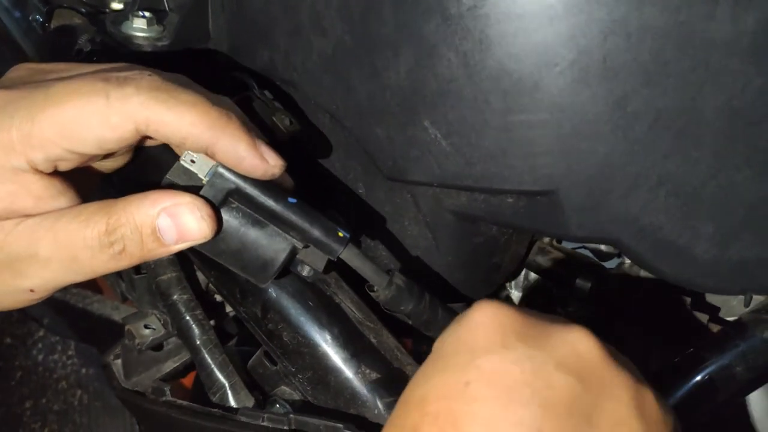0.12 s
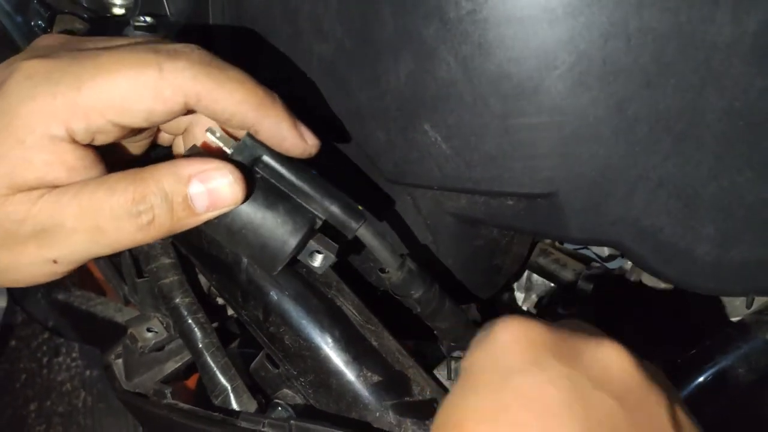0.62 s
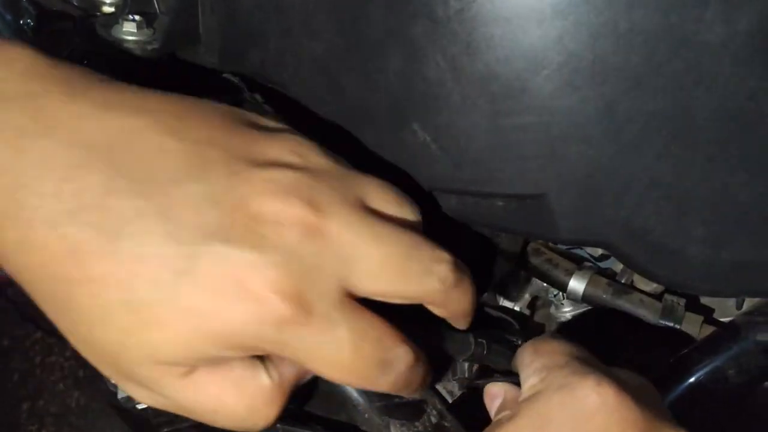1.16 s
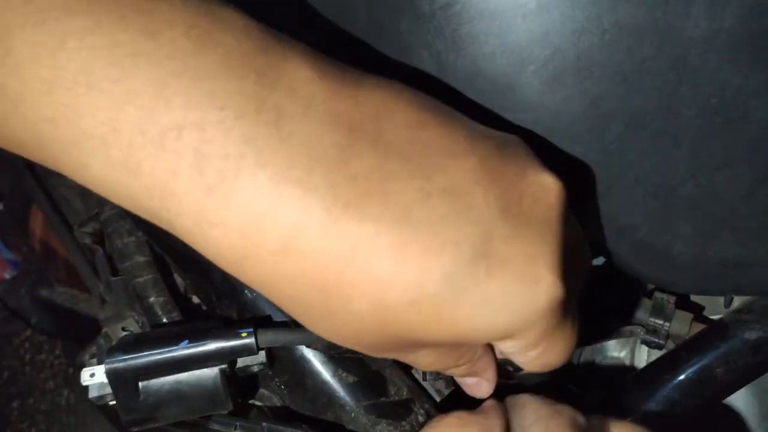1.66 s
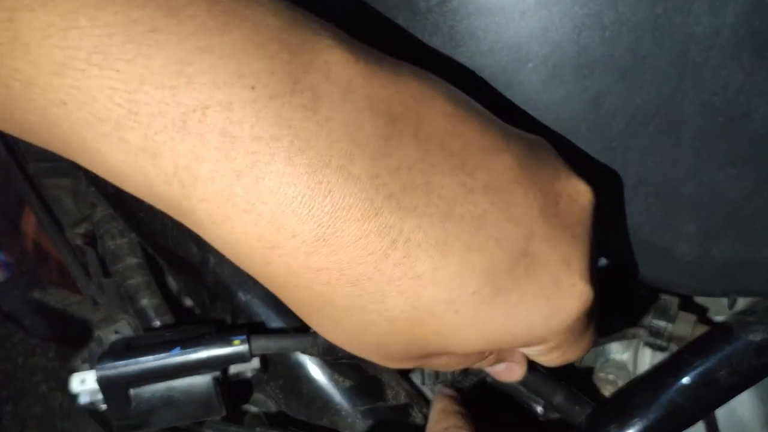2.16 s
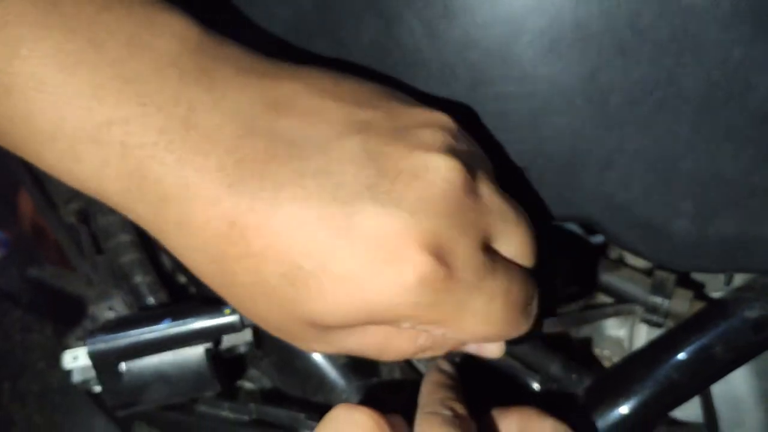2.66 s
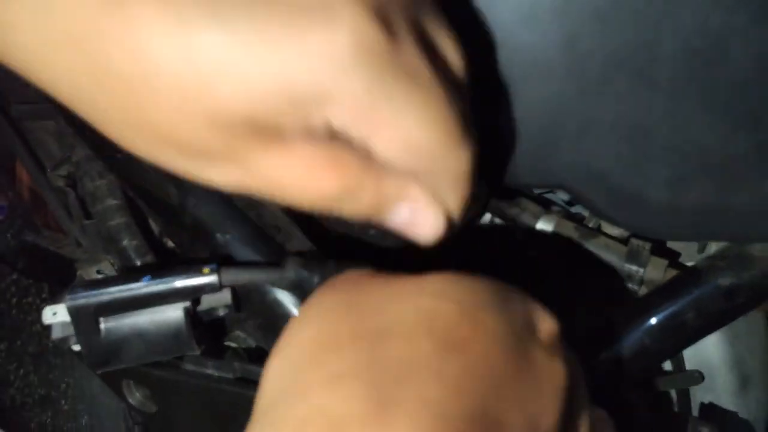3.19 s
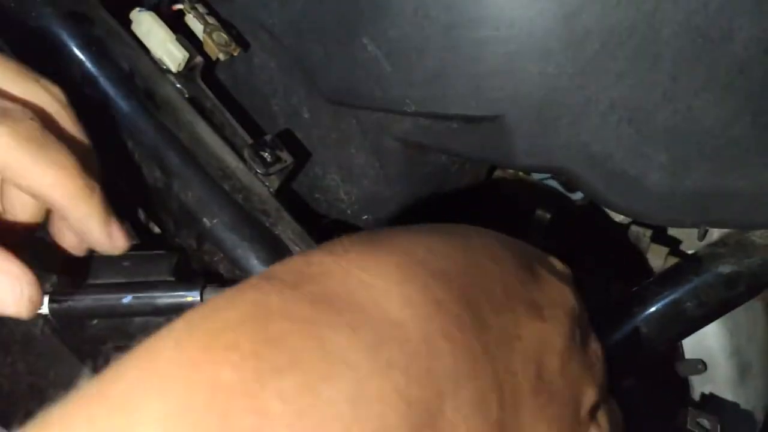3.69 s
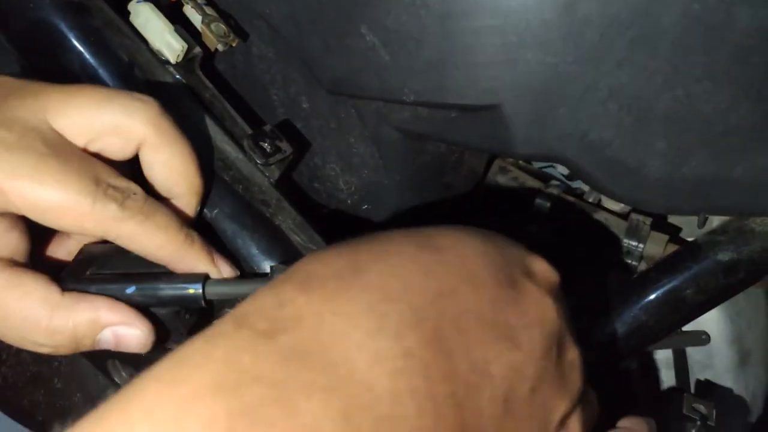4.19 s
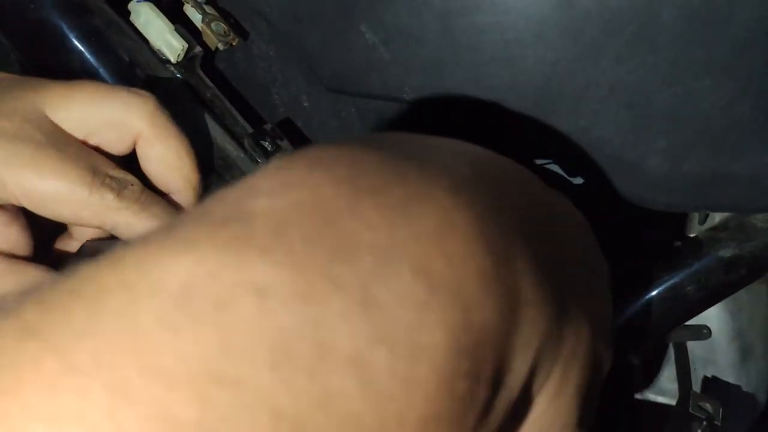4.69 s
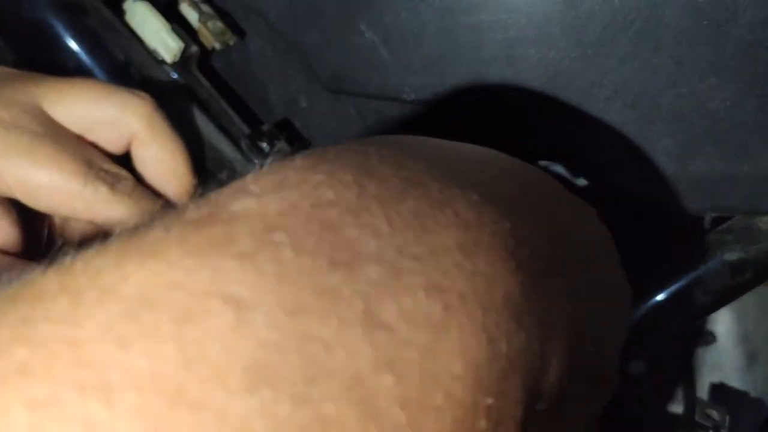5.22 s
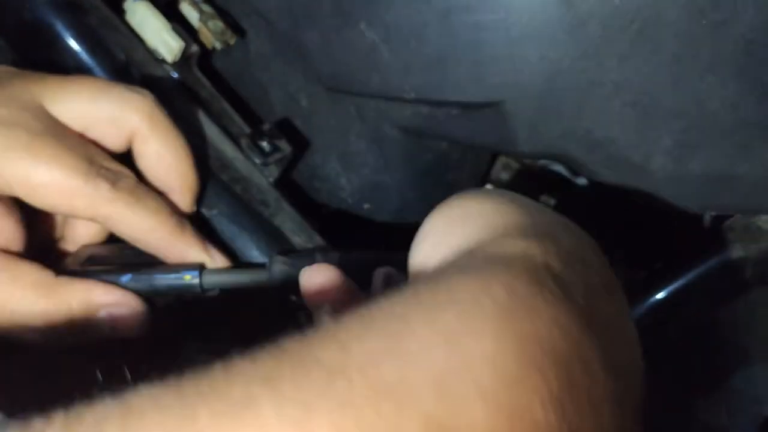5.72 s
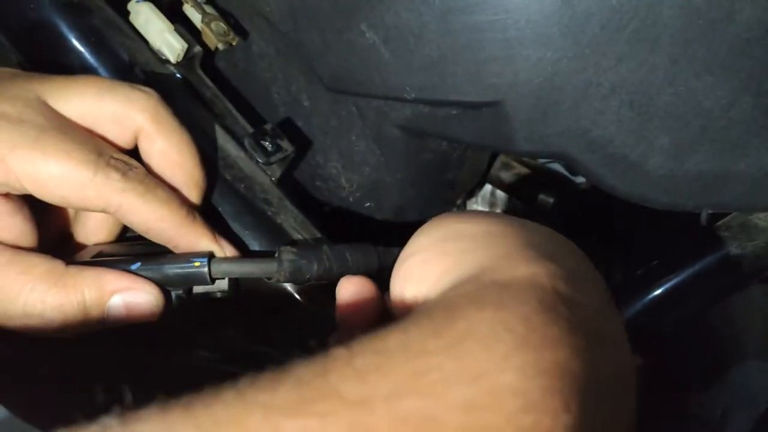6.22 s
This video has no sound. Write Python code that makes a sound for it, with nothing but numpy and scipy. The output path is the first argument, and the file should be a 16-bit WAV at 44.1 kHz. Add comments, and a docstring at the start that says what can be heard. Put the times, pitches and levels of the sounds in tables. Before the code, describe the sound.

Hands work on a scooter's coil and cable. After nearly silent fumbling, a hard plastic and metal hit rings out, then a second knock with a scrape. Sparse skin rustles, muted panel bumps and tiny snaps continue, much quieter. Close stereo pickup, sources slightly left, light room echo and steady low hiss.

```python
"""Hands free an ignition coil and its cable in the engine bay of a scooter, in a quiet workshop.
Room tone and microphone hiss, banded noise, run throughout; faint gliding squeaks of narrow noise come first.
Next cable and skin rub and rustle as shaped noise, and knocks on plastic panels excite damped modes.
At 0.73 s the coil clanks on the steel frame, strong modes over a clatter of noise; two softer clanks
follow near 4 s. Low hand bumps, decaying sines, join from 1.6 s; rubs and knocks go on to the end."""
import sys
import numpy as np
from scipy import signal
from scipy.fft import rfft, irfft
from scipy.io import wavfile

SR = 44100
rng = np.random.default_rng(int(sys.argv[2]) if len(sys.argv) > 2 else 0)


def put_to_file(sound):
    """Save the sound as 16-bit audio at rate SR, in the file named by the first command-line argument."""
    columns = np.atleast_2d(sound).T  # one column per channel
    safe = np.clip(columns, -1, 1)
    whole_steps = np.round(safe * 32767)
    wavfile.write(sys.argv[1], SR, whole_steps.astype(np.int16))


def invert_db(level):
    """Linear amplitude ratio for a level in decibels (20 dB per decade), elementwise."""
    return 10 ** (np.asarray(level, dtype=float) / 20)


N = 280431   # length in samples


def rms_one(x):
    """Scale to rms 1."""
    return x / np.sqrt(np.mean(x ** 2) + 1e-24)


def at_hz(points, hz, column=1):
    """Read a table on a log-frequency axis."""
    table = np.array(points)
    return np.interp(np.log(hz), np.log(table[:, 0]), table[:, column])


def band(x, low_hz, high_hz):
    """Gentle band-pass."""
    sos = signal.butter(2, [low_hz, min(high_hz, .45 * SR)], "band", fs=SR, output="sos")
    return signal.sosfilt(sos, x)


def drift(rate_hz):
    """Slow random wander: normal random points, rate_hz of them a second, joined by straight lines."""
    knots = rng.standard_normal(400)
    return np.interp(np.arange(N) / SR * rate_hz, np.arange(400), knots)


def banded_noise(spectrum, alike_table, patchy_db):
    """Third-octave bands of stereo noise, each with its own level, flicker and likeness; rms 1."""
    out, edges = 0, 25 * 2 ** (np.arange(29) / 3)
    white = rng.standard_normal((2, 2, N))
    for k, (low, high) in enumerate(zip(edges, edges[1:])):
        mid, side = band(white[k % 2], low, high)
        hz = np.sqrt(low * high)
        alike = np.clip(at_hz(alike_table, hz), -1, 1)
        gain = invert_db(at_hz(spectrum, hz) + patchy_db * drift(15.0))
        stereo = np.sqrt(1 + alike) * mid + np.sqrt(1 - alike) * side * [[1], [-1]]
        out = out + gain * stereo
    return rms_one(out)


def body(modes, apart_hz):
    """Ring of a struck body at both microphones; higher modes may differ more in phase, up to a limit."""
    left_lag_ms = 0.21
    t, out = np.arange(SR // 2 + SR // 4) / SR, 0
    for hz, level_db, t60 in modes:
        turn = rng.uniform(-0.93, 1) * min(hz / apart_hz, np.pi / 2)
        turn = turn + np.pi * hz * left_lag_ms / 1000
        fade_in = np.minimum(t * hz * 4, 1)   # a quarter cycle
        wave = np.sin(2 * np.pi * hz * t + turn * np.array([[-1], [1]]))
        out = out + invert_db(level_db - 60 * t / t60) * fade_in * wave
    return out


def add(out, sound, s, peak_db):
    """Lay a stereo sound in at time s; peak_db is the peak of its mono sum halved."""
    at = round(s * SR)
    peak = np.abs(sound.mean(axis=0)).max()
    out[:, at:at + sound.shape[1]] += invert_db(peak_db) * sound[:, :N - at] / peak


def contact(decay_ms, rise_ms=0.26, first=0.0):
    """A rattling touch: a noise burst that rises fast and dies away, with one firm impact if first > 0."""
    t = np.arange(SR // 8) / SR
    touch = rng.standard_normal(len(t)) * np.exp(-1000 * t / max(decay_ms, .2))
    touch = touch * np.minimum(1000 * t / rise_ms, 1)
    touch[round(rise_ms * SR / 1000)] += first * np.sqrt(np.sum(touch ** 2))
    return touch


def stroke(length_s, rising):
    """Swell and fade of one movement; rising is the share of it spent swelling."""
    progress = np.arange(round(length_s * SR)) / (length_s * SR)
    along = np.interp(progress, [0, np.clip(rising, .05, .95), 1], [0, .5, 1])
    return np.sin(np.pi * along) ** 1.3


# spectrum of room tone and hiss: pitch_hz, level_db (per Hz, relative)
TONE_SPECTRUM = [(25, -3.5), (60, -8), (100, -12.5), (230, -3), (400, -5.5), (600, -3), (1000, -5.5),
                 (1600, -7), (3200, -12), (6500, -14.5), (7500, -18), (9500, -19), (13500, -20.5),
                 (15700, -22.5)]
# how alike left and right are: pitch_hz, likeness (correlation, -1 to 1)
TONE_LIKENESS = [(60, 0.25), (150, 0.89), (380, 0.62), (950, 0.02), (2380, -0.027), (5980, 0.0083),
                 (15000, 0.035)]


def room_tone():
    """Faint room tone and microphone hiss: steady noise, more alike in the two channels in the bass."""
    return invert_db(-66) * banded_noise(TONE_SPECTRUM, TONE_LIKENESS, patchy_db=0.14)


# faint gliding squeaks: start_s, length_s, level_db, from_hz, to_hz
SQUEAK_EVENTS = [(0.076, 0.061, -73, 4000, 3900), (0.417, 0.037, -62.5, 4250, 4356),
                 (.45, .046, -63, 6300, 6446), (0.471, .086, -68.5, 4700, 4130),
                 (1.337, 0.055, -69, 6230, 6000), (3.39, .06, -70, 4400, 4970),
                 (3.64, 0.18, -70.5, 4230, 4780), (5.66, 0.067, -75, 4220, 4000),
                 (5.79, 0.111, -74, 4250, 4880)]


def squeaks():
    """Thin, broken, breathy tones that glide: narrow noise riding on a moving pitch."""
    out, broken = np.zeros((2, N)), invert_db(2.5 * drift(35.0))
    for s, length, level_db, from_hz, to_hz in SQUEAK_EVENTS:
        shape = stroke(length, 0.3)
        phase = 2 * np.pi * np.cumsum(np.linspace(from_hz, to_hz, len(shape))) / SR
        rough = rms_one(band(rng.standard_normal((2, 2, len(shape))), 12.0, 200.0))
        breathy = rough[0] * np.cos(phase) + rough[1] * np.sin(phase)
        at = round(s * SR)
        out[:, at:at + len(shape)] += invert_db(level_db) * shape * breathy
    return out * broken


# modes of the plastic panels: pitch_hz, level_db (relative), t60_s
PANEL_MODES = [(148.4, -9, 0.43), (189.6, 7, 0.04), (236.5, -5, 0.23), (277, -1, 0.064), (341.7, 5, 0.044),
               (406.6, 4, 0.037), (472, -5, 0.11), (528, 1.5, 0.063), (571.4, 4, 0.049), (669.4, 8, 0.04),
               (750, -3.5, 0.079), (829, -9, 0.13), (984, -4, 0.034), (1180, -7.5, 0.04)]


def panel_ring():
    """Plastic panels answer a push with a set of damped modes."""
    return body(PANEL_MODES, apart_hz=1500.0)


# rubs of cable and skin: start_s, length_s, rising (share of length), drag_db (on panels), rustle_db
RUB_EVENTS = [(0.237, 0.088, 0.226, -66, -64.5), (0.376, 0.22, .36, -77.5, -67.5),
              (1.053, 0.25, 0.051, -52.5, -60.5), (1.308, 0.21, 0.6, -74.5, -63.5),
              (1.399, 0.11, 0.22, -55.5, -73), (1.49, 0.22, 0.53, -55, -61), (1.679, 0.18, 0.21, -63, -64),
              (1.83, 0.039, 0.344, -60.5, -55.5), (2.6, 0.213, 0.33, -70, -80),
              (2.807, 0.1, 0.63, -62, -64.5), (2.939, 0.095, 0.81, -66, -59.5),
              (3.155, 0.129, .28, -69, -64.5), (3.356, 0.099, 0.4, -73, -66),
              (3.433, 0.13, 0.34, -52, -55.5), (3.519, 0.37, 0.2, -72, -68.5),
              (4.057, 0.25, 0.21, -70.5, -71), (4.36, 0.056, .08, -60, -55.5),
              (4.417, .36, 0.38, -66.5, -69.5), (5.103, 0.5, 0.11, -80.5, -70),
              (5.53, .074, 0.52, -50.5, -60), (5.578, .17, .2, -58, -68.5), (5.765, 0.21, 0.51, -83, -69.5),
              (5.879, .3, 0.114, -83, -63)]
# spectrum of skin rustle: pitch_hz, level_db (per Hz, relative)
RUSTLE_SPECTRUM = [(500, -30), (1000, -5), (2200, -5), (4500, -11.5), (6800, -12), (10000, -11.5),
                   (15500, -24)]


def rubs(panel):
    """Dragged cable sends dense slips into the panels; skin rustles, brightest round its centre."""
    brush_hz = 4700   # a light brush of skin is brightest here
    slips, out = np.zeros(N), np.zeros((2, N))
    slip_times = rng.random(N) < 500 / SR   # 500 a second on average
    grit = rms_one(rng.standard_normal(N) * slip_times * invert_db(2.1 * drift(32.0)))
    skin = banded_noise(RUSTLE_SPECTRUM, [(900, .3), (9000, .1)], patchy_db=1.2)
    skin = skin * invert_db(1.2 * drift(60.0))
    for s, length, rising, drag_db, rustle_db in RUB_EVENTS:
        shape = stroke(length, rising)
        here = slice(round(s * SR), min(round(s * SR) + len(shape), N))
        shape = shape[:here.stop - here.start]
        slips[here] += invert_db(drag_db) * shape * grit[here]
        # a firm drag spreads the rustle, a light brush keeps it narrow
        broad = invert_db(3.0 + 0.614 * (drag_db - rustle_db))
        narrow = band(skin[:, here], brush_hz / 1.33, brush_hz * 1.53)
        out[:, here] += invert_db(rustle_db) * shape * rms_one(broad * skin[:, here] + narrow)
    drag = signal.fftconvolve(panel, band(slips, 293.0, 1100.0)[None])[:, :N]
    return out + drag / np.sqrt(np.sum(panel ** 2) / 2)


# thumps on the panels: start_s, peak_db, centre_hz, contact_ms (decay of the touch)
THUMP_EVENTS = [(.263, -47.5, 568, 8.8), (.730, -24, 620, 6.4), (.959, -45, 580, 3.9),
                (1.042, -25.5, 534, 2.4), (1.047, -28.5, 250, 3.1), (1.053, -25, 450, 4.7),
                (1.106, -38.5, 422, 3), (1.403, -42.5, 435, 12), (1.444, -48.5, 297, 4.8),
                (1.577, -43.5, 565, 5), (1.595, -39, 540, 3.3), (1.606, -32.5, 620, 4.7),
                (1.619, -44, 590, 2.7), (1.763, -43, 750, 5.5), (1.837, -43.5, 232, 6.5),
                (2.030, -41.5, 620, 2.7), (2.786, -50.5, 352, 3.8), (2.843, -51, 500, 8.9),
                (2.866, -45, 440, 5), (2.919, -36, 624, 3.3), (3.041, -47, 425, 3),
                (3.095, -56.5, 600, 3.5), (3.151, -51.5, 700, 5.6), (3.952, -41, 641, 9.2),
                (3.965, -43.5, 523, 5), (4.365, -43, 640, 6.2), (5.557, -46.5, 250, 9),
                (5.575, -36.5, 520, 3), (5.751, -56, 304, 8), (5.974, -57.5, 400, 7.3)]


def thumps(panel):
    """A rattling push, banded round its own pitch, rings the nearby panel modes."""
    out = np.zeros((2, N))
    for s, peak_db, hz, ms in THUMP_EVENTS:
        push = band(contact(ms, rise_ms=1.665, first=0.82), hz / 2.11, hz * 2.16)
        push = band(push, hz / 2.3, hz * 2.2)   # a second pass keeps far modes still
        add(out, signal.fftconvolve(panel[:, :SR // 3], push[None]), s, peak_db)
    return out


# clicks of hard plastic: start_s, peak_db, centre_hz, contact_ms (decay of the touch)
CLICK_EVENTS = [(0.265, -48, 3500, 2.24), (.729, -16.5, 1500, 11.6), (.731, -27, 3760, 8.7),
                (1.042, -27.5, 4350, 2.72), (1.043, -30, 1330, 4.2), (1.594, -45, 3560, 6),
                (1.609, -50, 3470, 5.4), (1.646, -50.5, 4600, 12.2), (1.764, -41.5, 2780, 4.6),
                (3.010, -51, 2500, 3), (3.094, -55.5, 4000, 4), (3.151, -37.5, 4770, 4.3),
                (3.151, -44, 2090, 9.4), (4.183, -51.5, 4000, 1.24), (4.365, -46, 2780, 1.9),
                (5.307, -55.5, 6240, 4.8), (5.558, -45, 1580, 7.2), (5.562, -40.5, 4820, 5.1)]


def clicks():
    """Short snaps of hard plastic: banded noise bursts, partly different at each microphone."""
    out = np.zeros((2, N))
    for s, peak_db, hz, ms in CLICK_EVENTS:
        touch = contact(ms) + 1.54 * np.array([contact(ms), contact(ms)])
        octaves = 0.59 + 0.23 * hz / 1000   # a higher click spreads wider
        wide = 2 ** max(octaves / 2, .1)
        snap = band(touch, hz / wide, hz * wide) + 0.013 * band(touch, 1200.0, 8400.0)
        add(out, snap, s, peak_db)
    return out


# countless weak frame modes: pitch_hz, level_db (per Hz, relative)
CLATTER_SPECTRUM = [(120, -53), (200, -19.5), (307, -17.5), (471, -16), (550, 6.5), (663, -46), (873, 11),
                    (951, -10.5), (2400, -8.5), (3150, -26), (4600, -17.5), (5180, -43), (6260, -20.5),
                    (7300, -58.5), (12000, -62), (15600, -90), (22000, -120)]
# how long they ring: pitch_hz, t60_s
CLATTER_DECAY = [(300, 0.93), (1000, 0.6), (2500, 0.85), (5000, 0.748), (9000, 0.76)]


def clatter(t):
    """Dense weak modes heard as noise, each quarter-octave band dying at its own rate."""
    out, white = 0, rng.standard_normal((2, 2, len(t)))
    for k, hz in enumerate(200 * 2 ** (np.arange(24) / 4)):
        fall = invert_db(at_hz(CLATTER_SPECTRUM, hz) - 60 * t / at_hz(CLATTER_DECAY, hz))
        out = out + fall * band(white[k % 2], hz / 2 ** (1 / 8), hz * 2 ** (1 / 8))
    return out


# strong modes of the steel frame: pitch_hz, level_db (relative), t60_s
FRAME_MODES = [(311, 0, 0.24), (547.6, 2.5, 0.54), (563, -10.5, 0.6), (630, -0.5, 0.17), (742, -20.5, .3),
               (864, -1.5, 0.4), (1190, -16, 0.28), (1355, -31, 0.22), (1657, -8.5, 0.24),
               (1740, -24, 0.44), (2020, -1.5, 0.29), (1985, -7, 0.45), (2433, -9, 0.46), (2360, -42, .5),
               (2860, -24, .4), (3720, -14, 0.47), (4370, -35, .45)]
# blows that set the frame ringing: start_s, peak_db, top_hz (highest pitch the blow excites)
CLANK_EVENTS = [(0.7299, -23.5, 12000), (3.958, -50.5, 750), (4.365, -54, 2600)]


def clanks():
    """A blow rings a few strong modes of the steel frame over a dense clatter of weak ones."""
    out, ring = np.zeros((2, N)), body(FRAME_MODES, apart_hz=686.0)
    t = np.arange(ring.shape[1]) / SR
    swell = np.minimum(t / 0.03, 1)
    frame = rms_one(ring) + invert_db(-3) * rms_one(clatter(t)) * swell
    for s, peak_db, top_hz in CLANK_EVENTS:
        add(out, band(frame, 138.0, top_hz), s, peak_db)   # a soft blow leaves the high modes still
    return out


# soft low bumps of a hand on the bodywork: start_s, peak_db, pitch_hz, t60_s
BUMP_EVENTS = [(1.598, -54, 78, 0.23), (4.37, -65.5, 74, 0.172), (5.555, -50.5, 74, 0.19)]


def bumps():
    """A hand sets the bodywork moving: one low, damped sine, the same at both microphones."""
    out, t = np.zeros((2, N)), np.arange(SR // 2) / SR
    for s, peak_db, hz, t60 in BUMP_EVENTS:
        bump = np.sin(2 * np.pi * hz * t) * invert_db(-60 * t / t60) * np.minimum(t / 0.0161, 1)
        add(out, np.array([bump, bump]), s, peak_db)
    return out


# where the hands are: time_s, left_minus_right_db (for short waves)
HAND_PLACE = [(0.0, 4), (0.9, 2), (2.0, 3), (3.4, 3.5), (4.4, 6.5), (5.7, 5), (6.0, 9.5)]


def place(near):
    """Only shorter waves are louder at the nearer microphone; long waves reach both equally."""
    shadow_hz = 900
    pan_db = np.interp(np.arange(N) / SR, *np.transpose(HAND_PLACE))
    long_waves = signal.lfilter(*signal.butter(1, shadow_hz, fs=SR), near)
    return long_waves + invert_db(pan_db / 2 * np.array([[1], [-1]])) * (near - long_waves)


def colour(x, low_cut_hz, step_db):
    """Bass cut, and a sudden step down above seven kilohertz or so."""
    hz = np.fft.rfftfreq(N, 1 / SR)
    gain = invert_db(step_db * np.clip((hz - 6930) / 150 + .5, 0, 1))
    x = signal.sosfilt(signal.butter(2, low_cut_hz, "high", fs=SR, output="sos"), x)
    return irfft(rfft(x) * gain, N)


# echo of the room: pitch_hz, t60_s, level_db (relative)
ROOM_ECHO = [(145.7, 0.93, -6.5), (400, 0.77, -3.5), (950, 0.83, -4), (2500, 1, -2.5), (6000, 0.29, -6),
             (12000, 0.31, -27.5)]


def room(x):
    """Walls return a diffuse tail that dies octave by octave; only its long waves match left and right."""
    t, tail = np.arange(SR // 2 + SR // 4) / SR, 0
    white = rng.standard_normal((2, len(t)))
    shared = band(rng.standard_normal(len(t)), 27.0, 475.0)
    white = white - band(white, 30.9, 257.0) + shared   # long waves reach both alike
    for hz in 90 * 2. ** np.arange(8):
        fall = invert_db(-60 * t / at_hz(ROOM_ECHO, hz)) * np.clip(t / 0.0028, 0, 1)
        octave = band(white, hz / np.sqrt(2), hz * np.sqrt(2)) * fall / np.sqrt(np.sum(fall ** 2))
        tail = tail + invert_db(at_hz(ROOM_ECHO, hz, column=2)) * octave
    return signal.fftconvolve(tail, x.mean(axis=0)[None])[:, :N]


def scene():
    """Handling sounds placed where the hands are, their echo, the frame and the room tone."""
    panel = panel_ring()
    near = squeaks() + rubs(panel) + thumps(panel) + clicks() + bumps()
    near = colour(place(near), low_cut_hz=86.0, step_db=-4.5)
    # the frame skips the room: its clatter already holds the long diffuse tail
    frame = colour(clanks(), low_cut_hz=175.0, step_db=-4.0) * invert_db([[-1.5], [1.5]])
    return room_tone() + near + room(near) + frame


def top_cut(x):
    """Nothing passes above the cut-off."""
    return signal.sosfilt(signal.butter(12, 15720, fs=SR, output="sos"), x)


def record(dry):
    """The right microphone is a little more sensitive; both pass less above seven kilohertz."""
    mix = colour(dry * invert_db([[-.4], [.4]]), low_cut_hz=27.0, step_db=-5)
    return top_cut(mix)


dry = scene()
out = record(dry)
put_to_file(out)
```